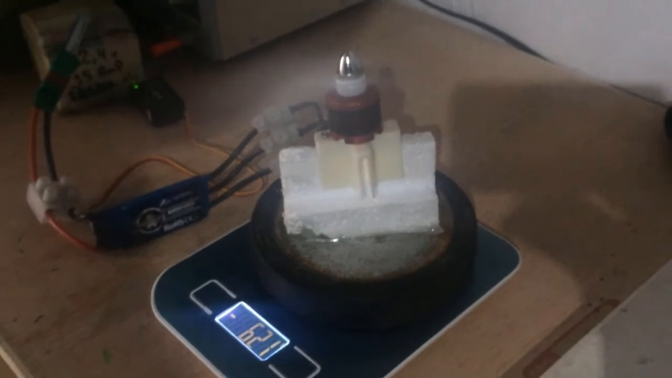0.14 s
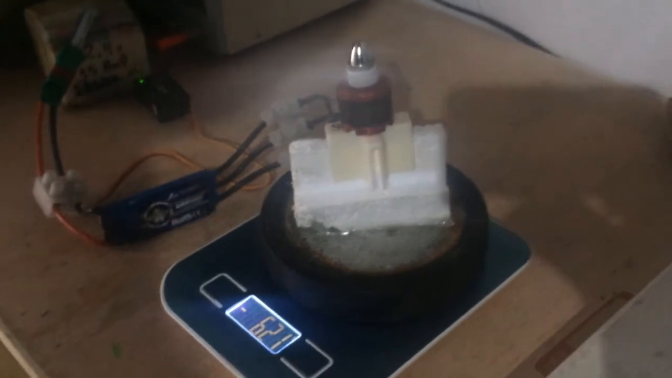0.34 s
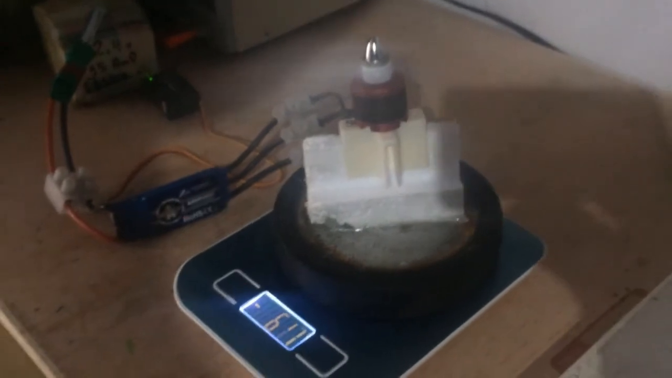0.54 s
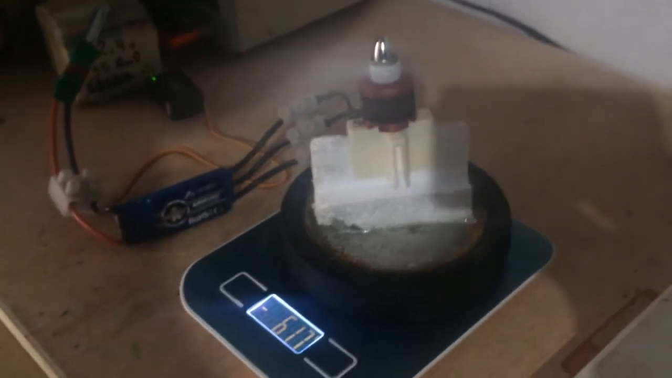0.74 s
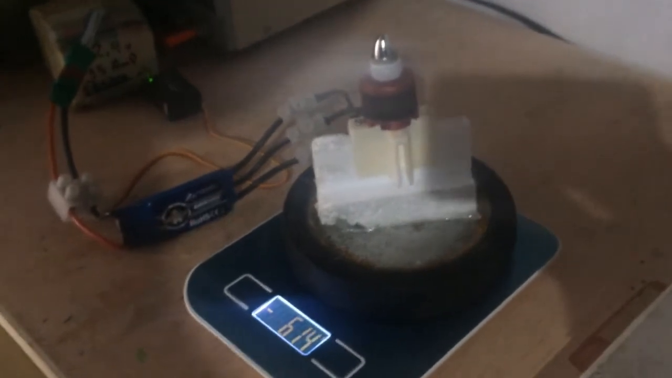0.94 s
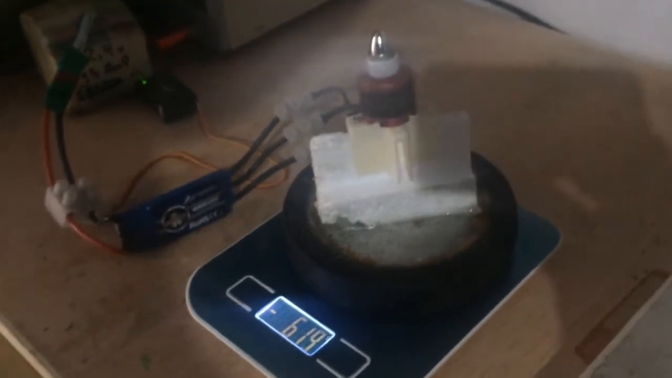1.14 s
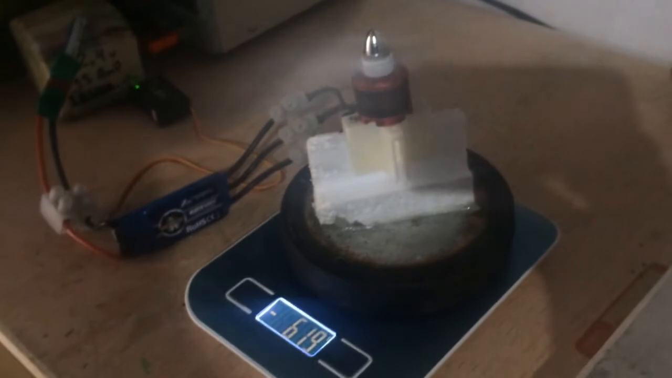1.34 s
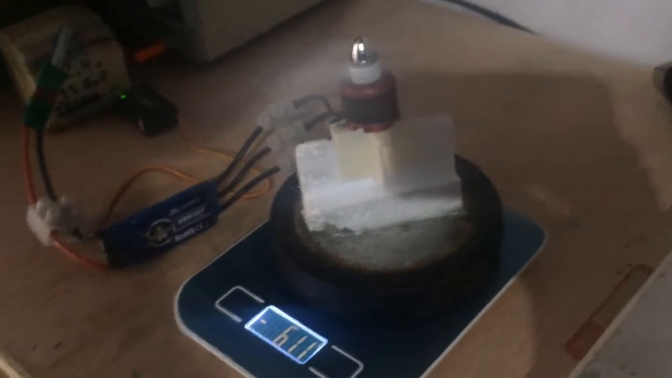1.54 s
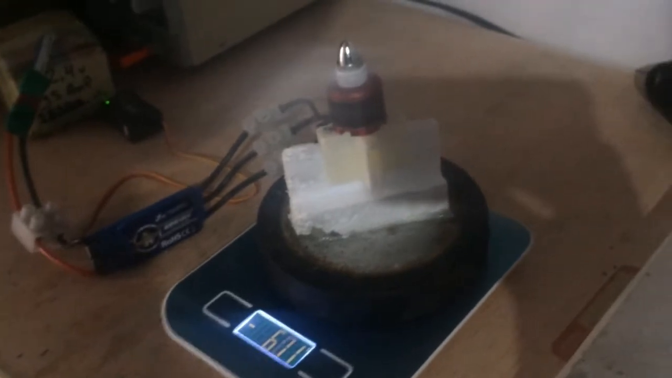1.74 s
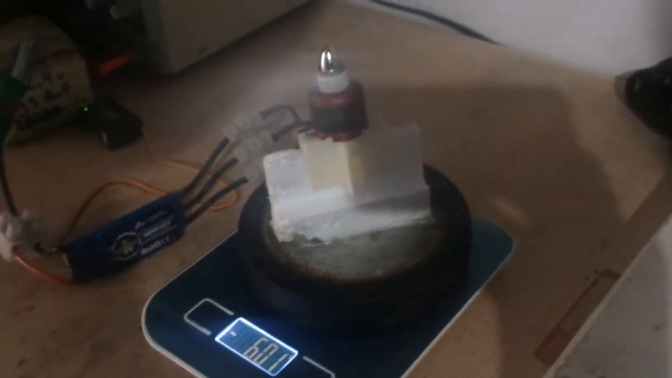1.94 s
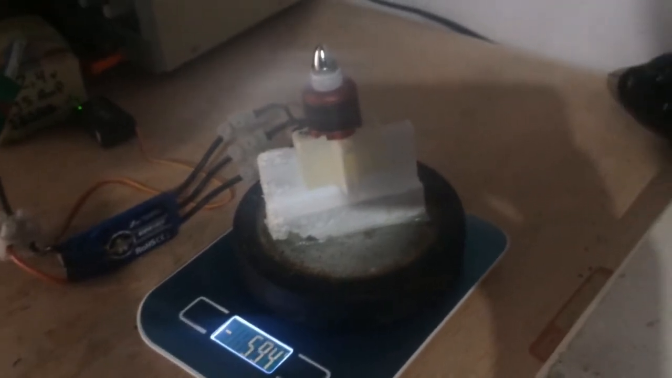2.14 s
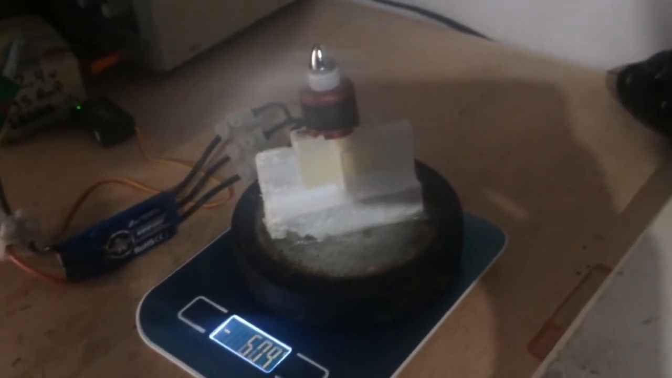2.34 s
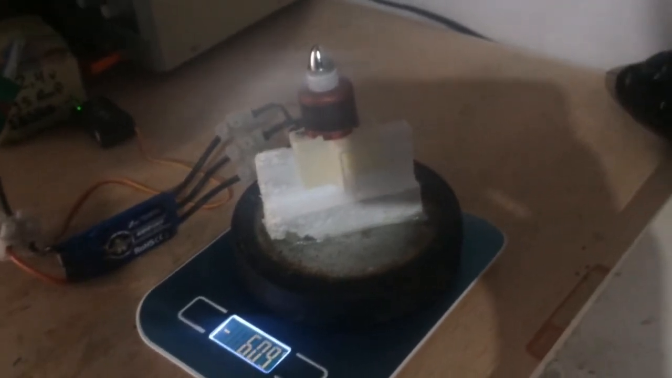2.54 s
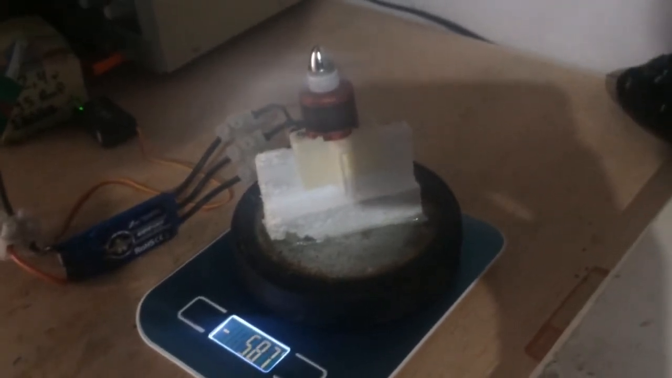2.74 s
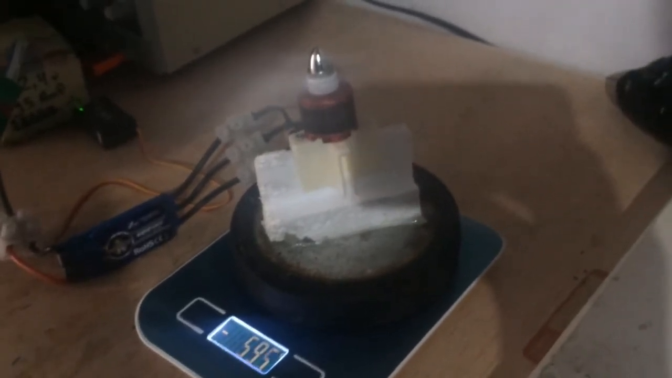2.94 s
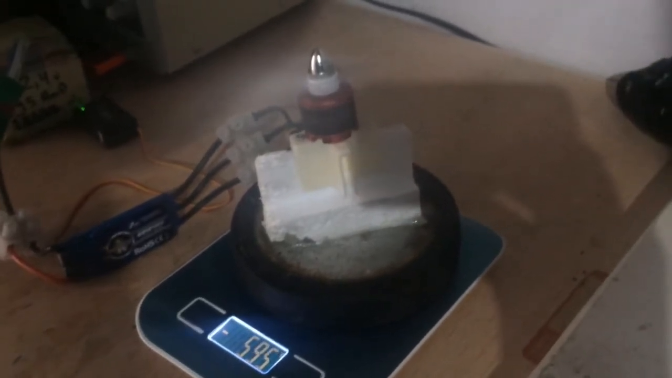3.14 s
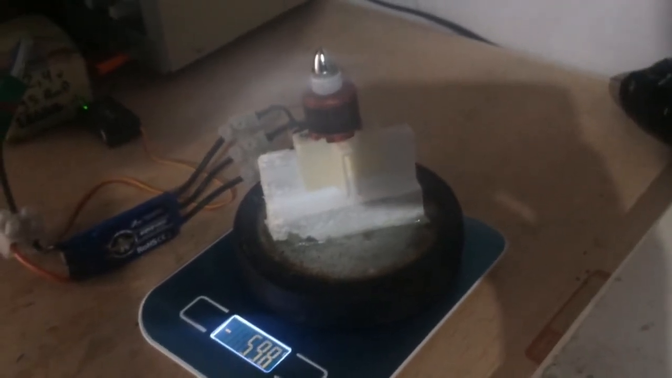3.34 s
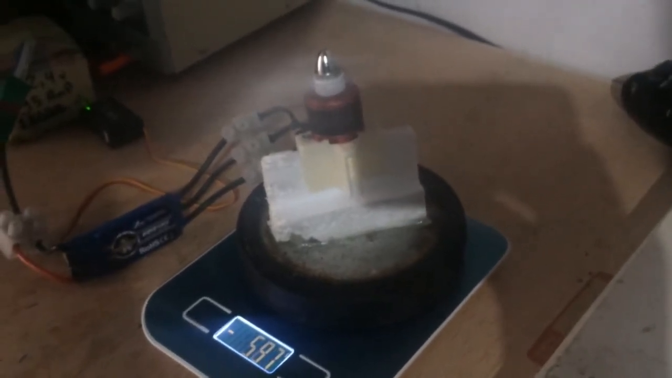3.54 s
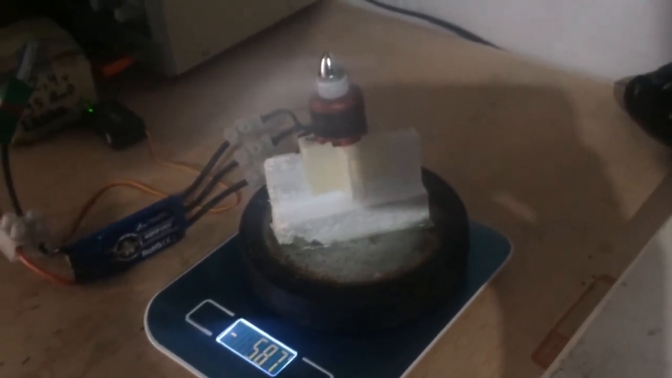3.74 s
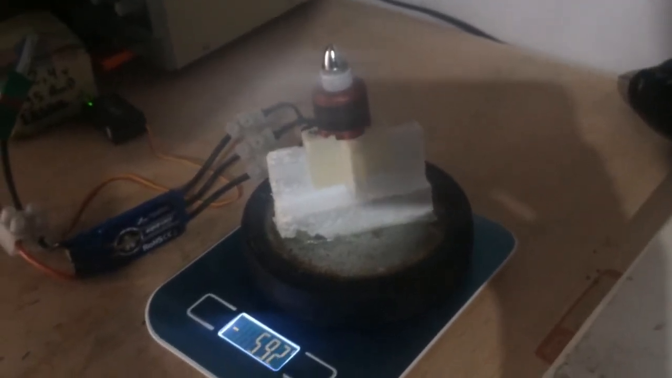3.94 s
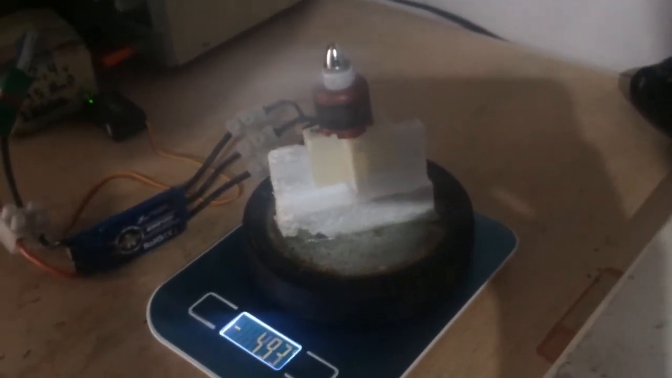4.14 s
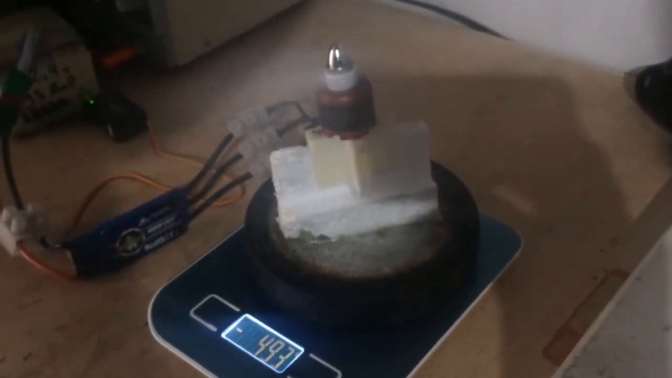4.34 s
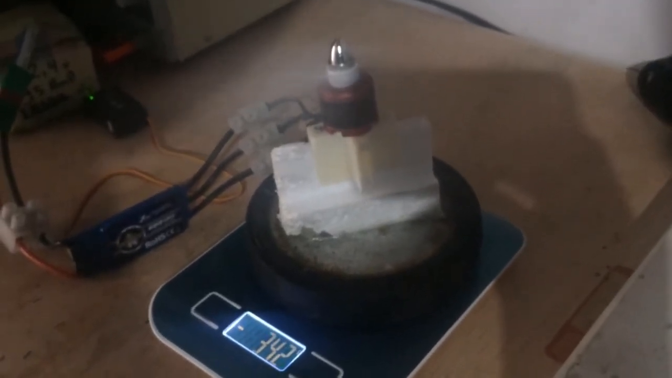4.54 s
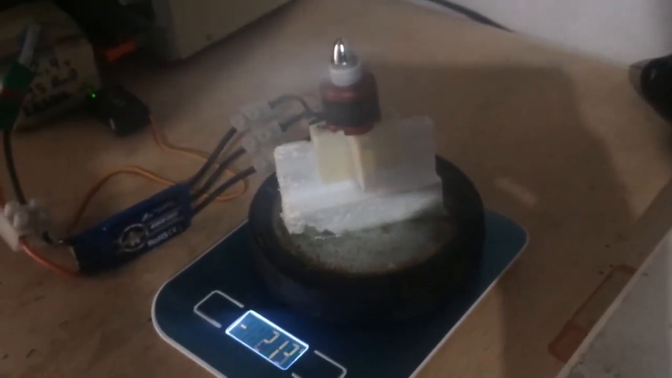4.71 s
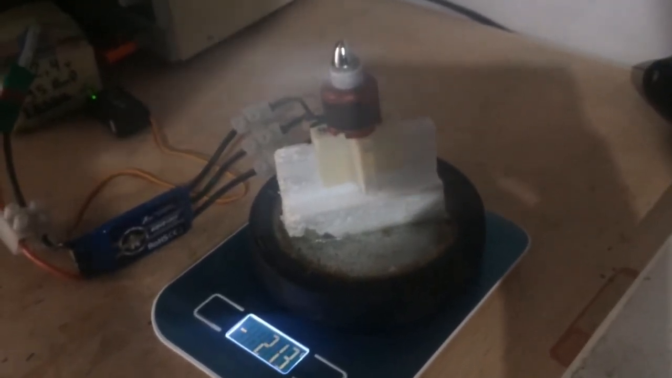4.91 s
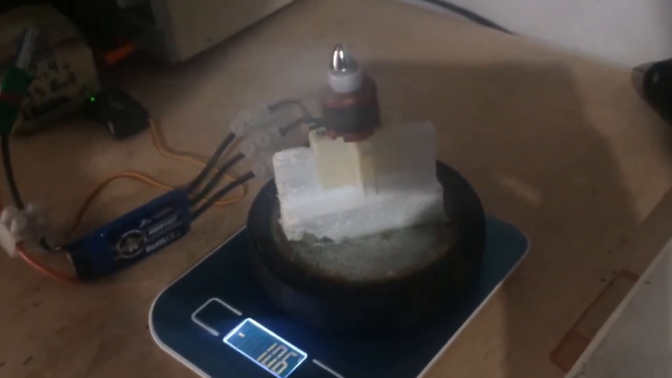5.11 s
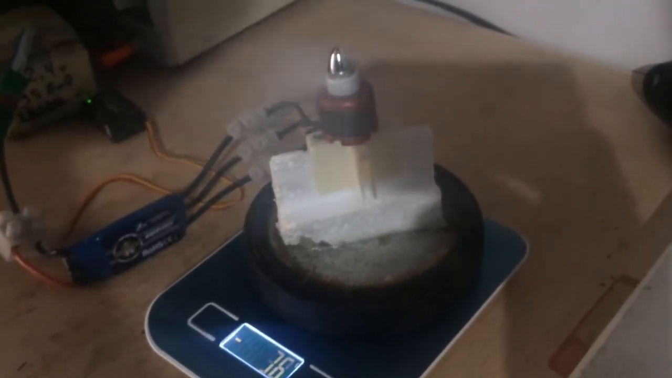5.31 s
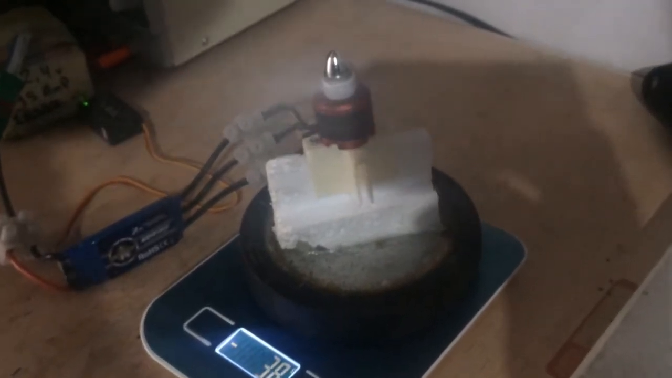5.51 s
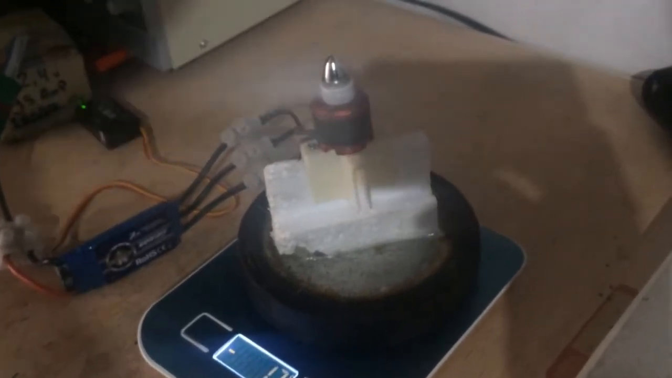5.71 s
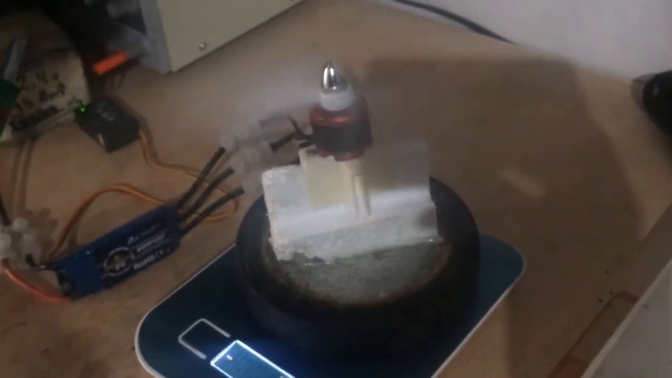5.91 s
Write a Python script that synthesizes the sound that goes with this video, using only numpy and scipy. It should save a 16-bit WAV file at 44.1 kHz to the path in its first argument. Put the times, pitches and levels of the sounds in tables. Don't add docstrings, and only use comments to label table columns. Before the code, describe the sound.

Loud steady propeller drone and piercing motor whine up close, then power drops, tones slide downward, and loose bearing knocks tick in near silence.

```python
import sys
import numpy as np
from scipy import signal
from scipy.fft import rfft, irfft, next_fast_len
from scipy.io import wavfile
from scipy.ndimage import uniform_filter1d

SR = 44100
rng = np.random.default_rng(int(sys.argv[2]) if len(sys.argv) > 2 else 0)


def store_pcm(level_fs):
    pcm = np.round(np.clip(level_fs, -1, 1) * 32767).astype(np.int16)
    wavfile.write(sys.argv[1], SR, np.atleast_2d(pcm).T)


def magnitude_from_level(level_db):
    exponent = np.asarray(level_db, float) / 20
    return 10 ** exponent


N = 263361

# time_s, shaft_hz
SHAFT_SPEED = [(0.09, 126.7), (1.55, 126.45), (2.05, 126.2), (3.74, 126.12), (3.81, 125.94), (3.88, 122.77),
               (3.98, 116.18), (4.08, 108.35), (4.18, 101.81), (4.28, 97.12), (4.68, 71.26), (4.78, 63.65),
               (5.08, 42.72), (5.18, 36.63), (5.28, 31.74), (5.58, 21.69), (5.78, 17.43), (5.97, 14.08)]
# time_s, share_of_full (0-1)
MOTOR_CURRENT = [
    (3.8, 1),
    (3.95, .2),
    (4.2, .04),
    (4.5, 0),
]
# time_s, angle (0-1)
MIC_ANGLE = [
    (0.4, 0),
    (1.05, 0.37),
    (1.5, 0.44),
    (1.8, 0.9),
    (2.4, 0.94),
    (3.05, 0.57),
    (3.6, 0.72),
]
BLADE_ORDERS = [1, 4, 6, 8, 10, 12.06, 16, 18, 20.1, 22.14, 24.12, 26.12, 28.1, 30.1, 32.1, 34.1, 36.05]
# level_db, unsteady_share (0-1)
BLADE_TONES = [(-34.5, 1), (-27.5, 0.59), (-26.5, 0.96), (-22.5, 0.91), (-23, 1), (-22.5, 1), (-25.5, 1),
               (-30.5, 1), (-26.5, 0.82), (-28, 0.99), (-30.5, 0.98), (-29.5, 1), (-34, 1), (-44, 0.32),
               (-38.5, 0.87), (-32.5, 0.66), (-37, 1)]
FULL_CURRENT_ORDERS = [7, 15.12, 19.12, 21.14, 38, 40, 44, 46, 48]
FULL_CURRENT_DB = [-39, -28, -39, -40, -30, -36, -28, -35, -39]
# time_s, level_db
CHOPPER_EFFORT = [
    (3.82, -90),
    (3.87, -24),
    (3.93, -27),
    (4.1, -15.5),
    (4.52, -19),
    (4.87, -21.5),
    (5.05, -32.5),
    (5.09, -47),
    (5.13, -92),
]
# chopper_multiple, shaft_multiple, mode_hz, level_db
SLIDING_FORCES = [(0, 1, 100, -26), (0, 6, 729, -22), (0, 14, 1400, -21), (0, 16, 1870, -22),
                  (0, 21, 1900, -25), (0, 44, 1850, -19), (0, 21, 2193, -18), (0, 42, 3213, -27),
                  (0, 42, 4960, -33), (0, 49, 4965, -22), (1, -35, 4984, -26), (0, 70, 4988, -25),
                  (0, 77, 5080, -35), (1, -28, 5130, -24), (1, -28, 5220, -22), (0, 98, 5165, -35),
                  (1, -21, 5790, -29), (1, -21, 6030, -30), (0, 84, 6695, -32), (1, -21, 6712, -42)]
# pitch_hz, level_db
AIR_SPECTRUM = [(150, -24), (370, -9), (700, -6), (1300, -4), (2000, 0.5), (3000, -0.5), (4200, -3),
                (5500, -1), (8000, -3), (11000, -8), (15500, -16)]
# pitch_hz, level_db (per Hz)
DRAUGHT_SPECTRUM = [(25, -45), (45, -11), (68, -3), (110, 0.5), (150, -11.5), (220, -7), (300, -10),
                    (500, -50)]
# pitch_hz, level_db
ROOM_SPECTRUM = [(25, -8), (42, -15), (55, 7.5), (75, -18), (110, -1), (300, -12), (560, 2.5), (900, -10),
                 (1200, -18), (1900, -20), (3500, -32), (15000, -44)]
# pitch_hz, width_hz, level_db
STAND_MODES = [(215, 38, -19), (528, 65, -8.5), (888, 270, -9), (1443, 62, 0), (1878, 64, 11),
               (2470, 186, 6.5), (3250, 203, -2), (6450, 2700, -30.5)]
# time_s, peak_db
BEARING_KNOCKS = [(4.9974, -16), (5.0158, -32), (5.0387, -22), (5.0592, -24), (5.085, -14), (5.159, -15),
                  (5.1949, -17), (5.214, -22), (5.2333, -19), (5.2647, -23), (5.337, -19), (5.3704, -15.5),
                  (5.4094, -25), (5.4467, -18.5), (5.4887, -19.5), (5.5216, -17), (5.5595, -21),
                  (5.577, -22), (5.61, -21.5), (5.6725, -22), (5.7263, -19.5), (5.782, -17.5), (5.84, -22),
                  (5.9042, -15)]
# full_speed_db (on axis), off_axis_db, decade_db (per decade of speed),
# knee_hz (shaft), steep_db (further, per decade below the knee)
BLADE_LAW = (-16, 2, 40, 32, 80)
HISS_LAW = (-23.5, 1.33, 14.5, 49.5, 102)
TOP_LAW = (-22.5, 1.74, -1.5, 84, 118)
DRAUGHT_LAW = (-30.5, 0.6, 51, 32, 112)
RATTLE_LAW = (-28, 6, 15, 27, 45)

START_S, BASS_LATE_S = .0838, .007
FULL_HZ = 126.4
CUT_S = 3.79
OCTAVE_DB = -6
POLE_DB, POLE_OFF_AXIS_DB, POLE_COLLAPSE_DB_S2 = -11, -7, 2000
MAGNET_DB, MAGNET_SAG_DB_S, MAGNET_CUT_DB, MAGNET_DB_DECADE = -17.5, 1.5, -4, 48
COGGING_DB, COGGING_MODE_HZ, COGGING_WIDTH_HZ = -45.5, 205, 36
CHOPPER_START_HZ, CHOPPER_DRIFT_HZ_S, CHOPPER_SIDE_DB = 7714, 52, -14
MODE_WIDTH, MODE_MIN_HZ = .018, 16
ROOM_DB = -43.5
SLACK_DB = 5


def unit(x):
    return x / np.sqrt(np.mean(np.abs(x) ** 2))


def columns(table):
    s, *rest = np.transpose(table)
    return [np.interp(np.arange(N) / SR, s, c) for c in rest]


def walk(rate_hz):
    knots = uniform_filter1d(rng.standard_normal((2, 4000)), size=2)
    place = np.arange(N) * np.clip(rate_hz, .1, 300) * 2 / SR
    real = np.interp(place, np.arange(4000), knots[0])
    imaginary = np.interp(place, np.arange(4000), knots[1])
    return real * 0.84 + 1.1j * imaginary


def colour(x, spectrum, lo_hz, hi_hz):
    size = next_fast_len(N)
    hz = np.arange(size // 2 + 1) * SR / size + 1
    curve_hz, curve_db = np.transpose(spectrum)
    shaped = rfft(x, size) * magnitude_from_level(np.interp(np.log(hz), np.log(curve_hz), curve_db))
    band = shaped[(hz > lo_hz) & (hz < hi_hz)]
    return irfft(shaped, size)[:N] * size / np.sqrt(2 * np.sum(np.abs(band) ** 2))


def ring(x, modes):
    return sum((-1) ** k * magnitude_from_level(db) * signal.lfilter(*signal.iirpeak(hz, hz / width, fs=SR), x)
               for k, (hz, width, db) in enumerate(modes))


def law(shaft_hz, angle, full_speed_db, off_axis_db, decade_db, knee_hz, steep_db):
    knee_loss_db = 10 * np.log10(1 + (knee_hz / shaft_hz) ** (steep_db / 10))
    return full_speed_db + off_axis_db * angle + decade_db * np.log10(shaft_hz / FULL_HZ) - knee_loss_db


def blades(turn, shaft_hz, tone_db):
    out = magnitude_from_level(tone_db + 1.1 * walk(8.1).real) * np.exp(2j * turn)
    load = np.clip((shaft_hz - 20) / (FULL_HZ - 20), 1e-6, 1)
    out = out + (1 - load ** 10) * load * magnitude_from_level(tone_db + OCTAVE_DB) * np.exp(4j * turn)
    coasting = .1 * (1 - load) * np.minimum(load / .2, 1) ** 2
    gusts = magnitude_from_level(2.0 * walk(12).real)
    for order, (db, share) in zip(BLADE_ORDERS, BLADE_TONES):
        share = np.clip(share, 0, 1) * np.sqrt(load)
        eddies = walk(16 + .7 * order) * magnitude_from_level(3 * walk(14).real - 1)
        flutter = np.sqrt(1 - share) + np.sqrt(share) * eddies
        fade = load ** (2.8 - .05 * order) + coasting / (1 + (480 / (order * shaft_hz)) ** 6)
        out = out + fade * gusts * magnitude_from_level(db) * flutter * np.exp(1j * order * (turn + order))
    return np.sqrt(2) * out.real


def magnets(turn, shaft_hz, angle):
    t = np.arange(N) / SR
    since = np.maximum(t - CUT_S, 0)
    full, = columns(MOTOR_CURRENT)
    pole_db = POLE_DB + POLE_OFF_AXIS_DB * angle - POLE_COLLAPSE_DB_S2 * since ** 2
    magnet_db = MAGNET_DB - MAGNET_SAG_DB_S * (t - since) + MAGNET_CUT_DB * (1 - full)
    magnet_db = magnet_db + MAGNET_DB_DECADE * np.log10(shaft_hz / FULL_HZ)
    detune = (14 * shaft_hz - COGGING_MODE_HZ) / (2 * COGGING_WIDTH_HZ)
    cogging = magnitude_from_level(COGGING_DB) / (1 + detune ** 2)
    out = magnitude_from_level(pole_db) * (1 + 0.2 * walk(16)) * np.exp(42j * turn)
    out = out + (magnitude_from_level(magnet_db) + cogging) * (1 + .3 * walk(20)) * np.exp(14j * turn)

    chop_hz = CHOPPER_START_HZ + CHOPPER_DRIFT_HZ_S * since
    chop_db, = columns(CHOPPER_EFFORT)
    chop = 2 * np.pi * np.cumsum(chop_hz + 6.1 * walk(30).real) / SR
    sideband = magnitude_from_level(CHOPPER_SIDE_DB) * np.exp(-2j * turn)
    out = out + magnitude_from_level(chop_db) * (1 + 0.19 * walk(25) + sideband) * np.exp(1j * chop)

    for order, db in zip(FULL_CURRENT_ORDERS, FULL_CURRENT_DB):
        out = out + full * magnitude_from_level(db) * (1 + .4 * walk(8)) * np.exp(1j * order * turn)
    for of_chop, of_shaft, mode_hz, db in SLIDING_FORCES:
        off_hz = of_chop * chop_hz + of_shaft * shaft_hz - mode_hz
        flare = np.exp(-(off_hz / max(MODE_WIDTH * mode_hz, MODE_MIN_HZ)) ** 2)
        tone = np.exp(1j * (of_chop * chop + of_shaft * turn))
        out = out + flare * magnitude_from_level(db) * (1 + 0.45 * walk(45)) * tone
    return np.sqrt(2) * out.real


def air(turn, hiss_db, top_db):
    puff = 1 + 0.033 * np.cos(2 * turn) + 0.053 * np.cos(turn) + 0.21 * np.cos(4 * turn)
    rush = rng.standard_normal(N) * puff * magnitude_from_level(1.0 * walk(14).real)
    noise = colour(rush, AIR_SPECTRUM, lo_hz=8060, hi_hz=15100)
    body = signal.sosfiltfilt(signal.butter(2, 7500, fs=SR, output="sos"), noise)
    return magnitude_from_level(hiss_db) * body + magnitude_from_level(top_db) * (noise - body)


def draught(draught_db):
    buffet = colour(rng.standard_normal(N), DRAUGHT_SPECTRUM, lo_hz=35, hi_hz=109.0)
    return magnitude_from_level(draught_db + 0.91 * walk(4.5).real) * buffet


def room():
    return magnitude_from_level(ROOM_DB) * colour(rng.standard_normal(N), ROOM_SPECTRUM, lo_hz=20, hi_hz=15000)


def bearing(turn, rattle_db, play):
    chance = rng.random((2, N))
    sizes = magnitude_from_level(-2.0 * np.log(chance[1] + 1e-9)) * np.sign(rng.standard_normal(N))
    grains = (chance[0] < 4000 / SR) * sizes
    race = np.interp(turn / (2 * np.pi) * 128 % 128, np.arange(129), rng.standard_normal(129))
    chatter = unit(grains * np.exp(0.99 * np.cos(turn))) + 0.84 * play * race
    chatter = magnitude_from_level(rattle_db + 2.46 * walk(24).real - 1.0) * unit(ring(chatter, STAND_MODES))

    knocks, age = np.zeros(N), np.arange(2500) / SR
    burst = np.minimum(age / 0.0029, 1) * (np.exp(-(age / .012) ** 2) + 0.17 * np.exp(-age / 0.045))
    for s, db in BEARING_KNOCKS:
        start = int((s - .0018) * SR)
        knocks[start:start + 2500] += magnitude_from_level(db) * burst[:N - start]
    hits = (rng.random(N) < 6000 / SR) * rng.uniform(-0.87, 1, N)
    return chatter + magnitude_from_level(-5) * ring(hits * knocks, STAND_MODES) / ring(hits, STAND_MODES).std()


def scene():
    shaft_hz, = columns(SHAFT_SPEED)
    angle, = columns(MIC_ANGLE)
    full, = columns(MOTOR_CURRENT)
    turn = 2 * np.pi * np.cumsum(shaft_hz + 0.055 * walk(9).real) / SR
    mix = blades(turn, shaft_hz, law(shaft_hz, angle, *BLADE_LAW))
    mix = mix + magnets(turn, shaft_hz, angle)
    mix = mix + air(turn, law(shaft_hz, angle, *HISS_LAW), law(shaft_hz, angle, *TOP_LAW))
    mix = mix + draught(law(shaft_hz, angle, *DRAUGHT_LAW)) + room()
    rattle_db = law(shaft_hz, angle, *RATTLE_LAW) + SLACK_DB * (1 - full)
    mix = mix + bearing(turn, rattle_db, play=1 - .75 * full)
    return np.tile(mix, (2, 1))


def low_pass(x):
    return signal.sosfilt(signal.butter(12, 15620, fs=SR, output="sos"), x)


def record(dry):
    since_start = np.arange(N) / SR - START_S
    gate = np.clip(since_start / 0.002, 0, 1)
    bass_in = np.clip((since_start - BASS_LATE_S) / .006, 0, 1)
    bass = signal.sosfiltfilt(signal.butter(2, 600, fs=SR, output="sos"), dry)
    flattened = np.clip((dry - bass * (1 - bass_in)) * gate, -.92, .92)
    top_cut = signal.ellip(8, .2, 70, 15500, fs=SR, output="sos")
    return low_pass(signal.sosfilt(top_cut, flattened))


dry = scene()
out = record(dry)
store_pcm(out)
```